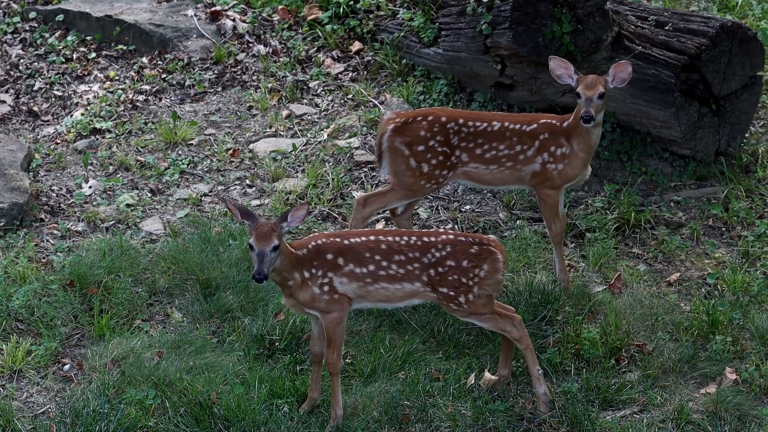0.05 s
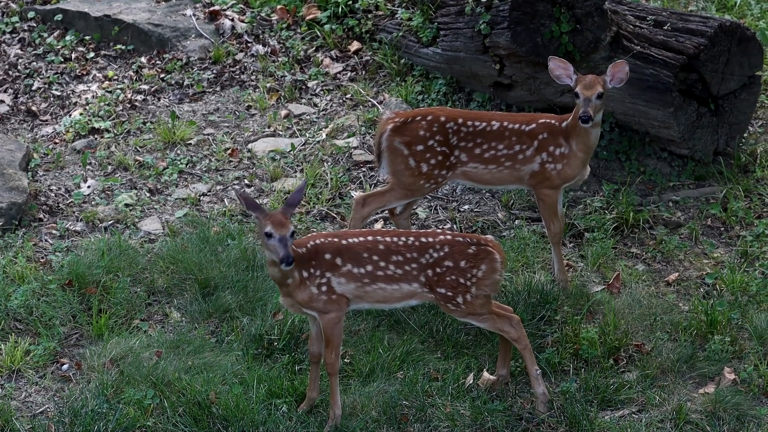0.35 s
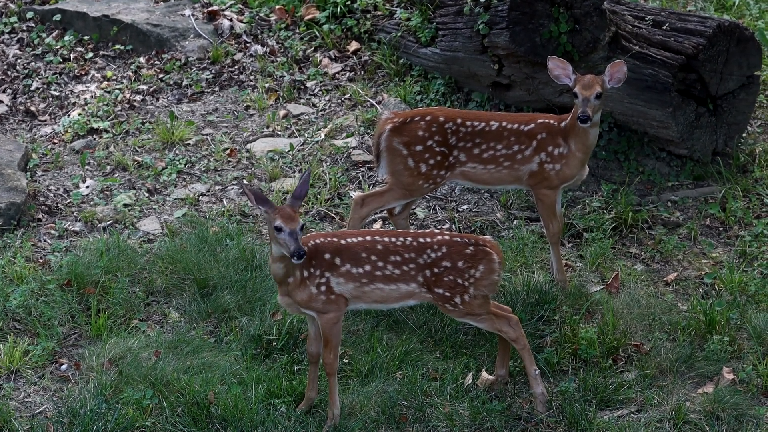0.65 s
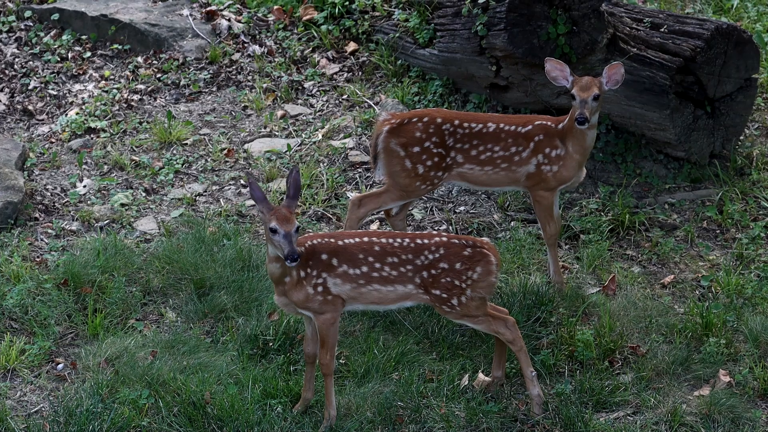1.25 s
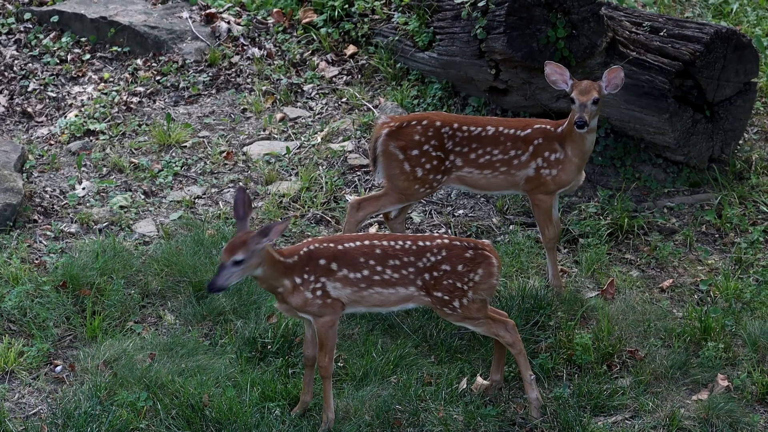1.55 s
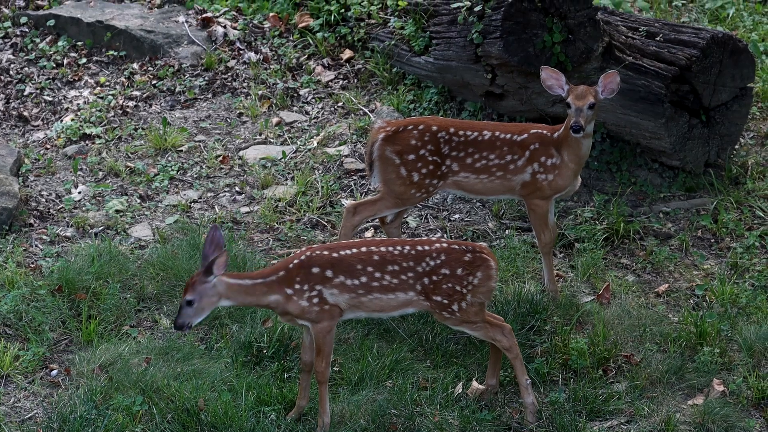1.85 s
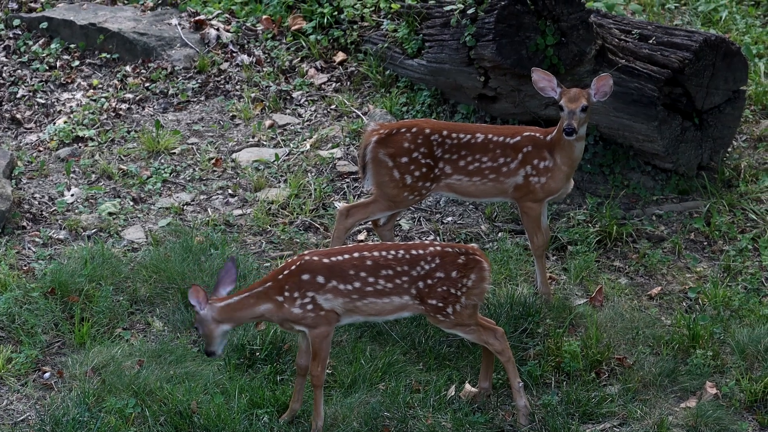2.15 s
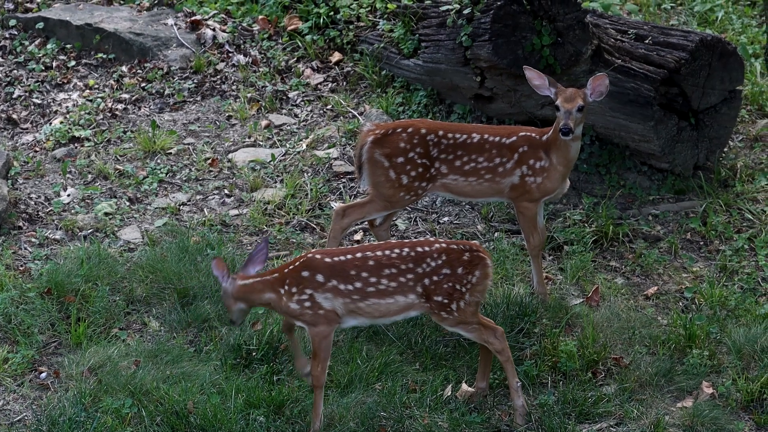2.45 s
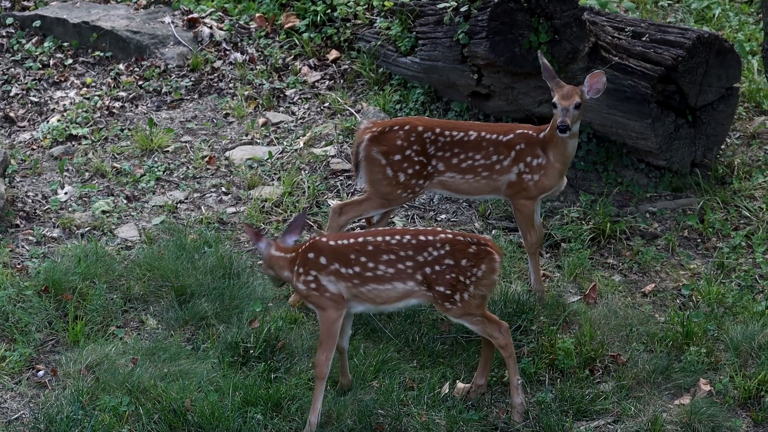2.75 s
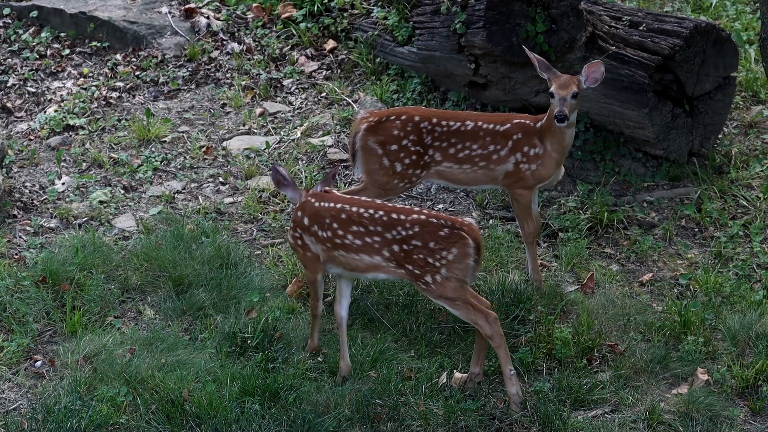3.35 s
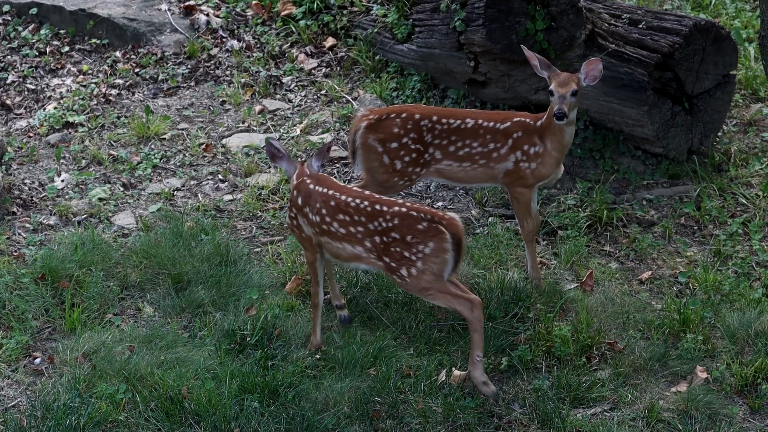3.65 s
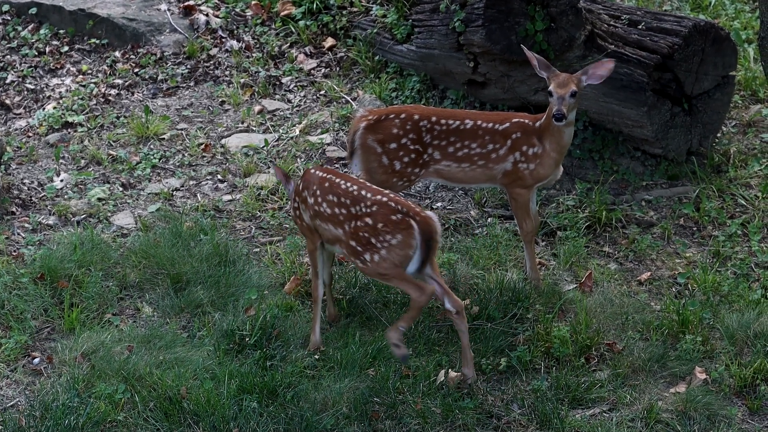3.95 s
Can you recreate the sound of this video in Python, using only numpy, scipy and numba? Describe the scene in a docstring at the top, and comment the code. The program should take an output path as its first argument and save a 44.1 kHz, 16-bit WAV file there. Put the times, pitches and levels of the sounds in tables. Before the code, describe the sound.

Cicadas buzz in a summer back yard, two nearer ones throbbing in turn over a steady, high chorus. Distant traffic murmurs underneath, and in the second half a few soft puffs of wind bump the microphone.

```python
"""Two cicadas throb out of step in the trees of a summer back yard, over a steady chorus of far ones.
Each buckles its ribs in a train of clicks that drives resonances: a thin whine builds and breaks
into a fuller, falling rasp, and leaves scatter the sound. Distant traffic murmurs below,
and a few soft, low buffets of air strike the microphone in a faint breeze."""
import sys
import numpy as np
from scipy import signal
from scipy.fft import rfft, irfft
from scipy.io import wavfile
from numba import njit

SR = 44100
rng = np.random.default_rng(int(sys.argv[2]) if len(sys.argv) > 2 else 0)


def transcribe(u):
    """Save the signal u as a 16-bit wav file named by the first command-line argument.

    u: samples, shape (n,) or (channels, n), limited to [-1, 1]; the rate is SR.
    q: integer samples, one column per channel.
    """
    v = np.clip(np.atleast_2d(u).T, -1, 1)
    q = np.round(v * 32767).astype(np.int16)
    wavfile.write(sys.argv[1], SR, q)


N = 176400
ROAD_PAN_DB = -1.5
# spectrum of air eddies on the microphone: f/Hz, relative level/dB
EDDY_SPECTRUM = [(20, -24), (50, -11.5), (100, 3), (150, -3), (250, -13), (400, -25.5), (900, -57),
                 (3000, -80)]


def cicada(throbs, level_db, click_hz, jitter, start_hz, width_hz,
           attack_s, build_s, whine_db, pan_db, wet_db):
    """Forced resonance: clicks ring a high whine that builds, then yields to the abdomen's falling rasp."""
    # narrow resonances in the buzz: f/Hz, bandwidth/Hz, relative level/dB
    modes = [(3030, 53, -4), (3356, 36, -11), (3620, 19, -7), (3760, 14, 7.5), (4080, 54, 0),
             (4300, 45, -2), (4645, 137, 1)]
    release_s, whine_cut_s = .04, .023
    t = np.arange(N) / SR
    rasp_hz, rasp_gain, whine_gain = np.full(N, float(start_hz)), 0, 0
    for start, length, rasp_db, lead_db, low_hz in [(a, b, c, e, d) for a, b, c, d, e in throbs]:
        age = t - start
        glide_hz = start_hz * (low_hz / start_hz) ** np.clip(age / length, 0, 1)
        rasp_hz = np.where(age < 0, rasp_hz, glide_hz)
        attack = np.clip(age / attack_s, 0, 1)
        release = np.exp(-np.maximum(age - length, 0) / release_s)
        rasp_gain += undb(rasp_db) * attack * release
        whine_gain += undb(lead_db) * np.exp(-(age / np.where(age < 0, build_s, whine_cut_s)) ** 2)
    clicks = tymbal(click_hz, jitter)
    rasp = rasp_gain * unit(resonate(clicks, rasp_hz, width_hz))
    whine = undb(whine_db) * whine_gain * unit(resonate(clicks, hz=5846, width_hz=1400))
    body_band = signal.butter(6, [3017, 7050], "band", fs=SR, output="sos")  # what the body radiates
    buzz = signal.sosfilt(body_band, rasp + whine)
    ringing = sum(undb(db + 6) * resonate(buzz, hz, width, stages=1) for hz, width, db in modes)
    return unit(leaves(buzz + ringing, wet_db)) * undb(level_db) * pan(pan_db)


def tymbal(click_hz, jitter, count=3000, scatter_db=2.5):
    """Elastic buckling: a cicada's ribs snap in a train of impulses, uneven in spacing and strength."""
    gap, size = rng.standard_normal((count, 2)).T
    at = (np.cumsum(np.exp(jitter * gap)) * SR / click_hz).astype(int)
    return np.bincount(at[at < N], undb(scatter_db * size)[at < N], N)


def leaves(x, wet_db, t60_s=.33):
    """Multiple scattering: foliage adds a decaying tail to the direct sound, different in each ear."""
    t = np.arange(SR // 2) / SR
    tail = rng.standard_normal((2, len(t))) * undb(-60 * t / t60_s)
    tail *= undb(wet_db) / np.sqrt(np.sum(tail ** 2, axis=1, keepdims=True))
    return x + irfft(rfft(tail, N) * rfft(x), N)


def chorus(count=10, click_hz=331.6, base_db=-33.5):
    """Incoherent summation: far cicadas, each with its own click rate and path, merge into a sizzle."""
    # spectrum of the chorus: f/Hz, relative level/dB
    spectrum = [(2000, -49), (2750, -54), (3150, -12), (3550, -1.5), (4000, -1.5), (4600, -2), (5250, 1),
                (5900, -1), (6400, -4.5), (6900, -10), (8100, -10.5), (8600, -18.5), (9300, -22.5),
                (10700, -20), (12200, -28), (14000, -39), (15500, -55)]
    # slow swell of the chorus: t/s, relative level/dB
    swell = [(0, 2), (.3, -1.5), (.55, 0.4), (.95, 1.3), (1.6, 0.1), (1.85, 0), (2.25, 0.1), (2.55, 0.8),
             (2.9, .5), (3.3, 0.6), (4, 0.4)]
    voices = 0
    for _ in range(count):
        clicks = tymbal(click_hz * np.exp(.15 * rng.standard_normal()), jitter=.25)
        clicks *= undb(2 * drift(3.8))
        path_blur = rng.standard_normal((2, SR // 8)) * np.linspace(1, 0, SR // 8)
        voices += rfft(clicks - clicks.mean()) * rfft(path_blur, N)
    return colour(irfft(voices, N), spectrum) * undb(base_db + over_time(swell)) * pan(-.5)


def traffic(level_db=-35, left_lag_s=4e-5):
    """Interaural delay and level set a far rumble slightly to the right; its bass is coherent."""
    # spectrum of distant engines and tyres: f/Hz, relative level/dB
    spectrum = [(20, -32), (40, -21), (65, -10), (120, 1.5), (210, -0.5), (300, -3), (420, -5), (650, -4.5),
                (900, -2), (1250, -7.5), (1700, -12), (2500, -21), (4000, -16), (9000, -59)]
    # likeness of the two ears' signals: f/Hz, correlation
    correlation = [(40, 1), (130, 1), (280, 0.84), (600, 0.6), (1100, 0.15), (3000, 0.017)]
    coherence = np.clip(over_hz(correlation), -.99, .99)
    mid, side = rfft(rng.standard_normal((2, N))) * np.sqrt([1 + coherence, 1 - coherence])
    delay = np.exp(-2j * np.pi * np.fft.rfftfreq(N, 1 / SR) * left_lag_s)
    ears = irfft(np.array([(mid + side) * delay, mid - side]), N)
    return colour(ears, spectrum) * undb(level_db) * pan(ROAD_PAN_DB)


def tyres():
    """Rolling noise: a soft band of far tyre roar, whose centre drifts as the cars change."""
    # tyre wash on the far road: t/s, centre f/Hz, level/dB
    wash = [(0, 870, -40.5), (.6, 840, -44), (1.4, 834, -46.5), (2, 910, -49), (3.2, 990, -45),
            (4, 905, -47)]
    centre_hz = over_time(wash)
    roar = np.array([resonate(ear, centre_hz, width_hz=430) for ear in rng.standard_normal((2, N))])
    return unit(roar) * undb(over_time(wash, column=2)) * pan(ROAD_PAN_DB)


def buffets():
    """Turbulent pressure: brief low puffs of air, uncorrelated at the two microphone ports."""
    # puffs: peak t/s, Gaussian width/s, level/dB, left minus right/dB, frequency ratio
    puffs = [(2.08, 0.021, -35, -24, 0.84), (2.322, 0.032, -30, 13, 1.13), (2.394, 0.01, -23, 19, 0.74),
             (2.426, 0.017, -22.5, -6, 0.82), (2.492, 0.015, -30.5, -24, 0.91),
             (2.614, 0.0068, -28, -13, 0.8), (2.852, 0.011, -23, -13, 0.93),
             (2.872, 0.0047, -18, -31, 1.14), (2.896, 0.012, -25.5, -9, 1.04), (2.972, 0.006, -26, 12, 0.8),
             (3.57, 0.0099, -35, 10, 0.77)]
    t, out = np.arange(N) / SR, 0
    eddies = rng.standard_normal((2, N))
    for at, width, db, pan_db, brightness in puffs:
        envelope = np.exp(-.5 * ((t - at) / width) ** 2)
        puff = colour(eddies * envelope, EDDY_SPECTRUM, brightness)
        puff *= np.sqrt(np.sum(envelope ** 2) / np.sum(puff ** 2, axis=1, keepdims=True))
        out += puff * undb(db) * unit(pan(pan_db))
    return out


def breeze():
    """Weak turbulence: moving air flutters faintly on the microphone around the buffets."""
    # strength of the breeze: t/s, level/dB
    strength = [(0, -59), (1.5, -58), (2.101, -43.5), (2.6, -48), (3.1, -49), (4, -56)]
    flutter = colour(rng.standard_normal((2, N)), EDDY_SPECTRUM, brightness=.64)
    return flutter * undb(over_time(strength) + 2 * drift(6.3))


def resonate(x, hz, width_hz, stages=2):
    """Resonators in cascade: each stage steepens the skirts of the band."""
    for _ in range(stages):
        x = bandpass(x, hz * np.ones(N), float(width_hz))
    return x


@njit
def bandpass(x, hz, width_hz):
    """Second-order resonance with unit gain at its moving centre."""
    y, band_state, low_state = np.empty(len(x)), 0., 0.
    for i in range(len(x)):
        tuning, damping = np.tan(np.pi * hz[i] / SR), width_hz / hz[i]
        band = (band_state + tuning * (x[i] - low_state)) / (1 + tuning * (tuning + damping))
        band_state = 2 * band - band_state
        low_state += 2 * tuning * band
        y[i] = damping * band
    return y


def colour(x, spectrum, brightness=1):
    """Linear filtering by (f/Hz, level/dB) points, their frequencies times brightness; rms 1."""
    gain = undb(over_hz([(hz * brightness, db) for hz, db in spectrum]))
    return unit(irfft(rfft(x) * gain, N))


def drift(rate_hz):
    """Low-passed noise: a smooth random drift of spread about 1."""
    f = np.fft.rfftfreq(2 * N, 1 / SR)
    return unit(irfft(rfft(rng.standard_normal(2 * N)) * np.exp(-(f / rate_hz) ** 2)))[:N]


def over_hz(points):
    """Interpolation of (f/Hz, value) points in log frequency."""
    hz, value = np.array(points, float).T
    return np.interp(np.log(np.fft.rfftfreq(N, 1 / SR) + 1), np.log(hz), value)


def over_time(points, column=1):
    """Linear interpolation of (t/s, values) rows at every sample."""
    columns = np.array(points, float).T
    return np.interp(np.arange(N) / SR, columns[0], columns[column])


def pan(db):
    """Interaural level difference, left minus right, as two gains."""
    return undb(np.array([[db], [-db]]) / 2)


def undb(db):
    """Decibels to amplitude ratio."""
    return 10 ** (np.asarray(db) / 20)


def unit(x):
    """Normalisation to rms 1."""
    return x / np.sqrt(np.mean(x ** 2))


def scene():
    """Superposition of two near cicadas, the far chorus, traffic and moving air."""
    # each cicada's throbs: t/s, length/s, relative rasp level/dB, lowest f/Hz, relative whine level/dB
    first_throbs = [(.41, 0.18, -4, 3400, 1), (1.145, 0.11, -1, 3450, 1), (1.775, 0.11, -1.5, 3400, 2.5),
                    (2.39, 0.107, 1, 3380, 1), (3.028, .1, 2, 3200, -0.5), (3.672, 0.076, 5.5, 3470, 0)]
    second_throbs = [(-.13, 0.2, 0.5, 3700, -1), (.59, 0.13, .5, 4000, -0.5), (1.265, 0.099, 3, 3950, -2),
                     (1.905, 0.095, 4.5, 3740, 1), (2.555, 0.15, 2.5, 3670, -.5),
                     (3.27, 0.13, 0, 3830, 0.5), (3.93, .15, -6, 4000, -2)]
    first = cicada(first_throbs, level_db=-39.5, click_hz=339.5, jitter=.12, start_hz=4900,
                   width_hz=1250, attack_s=.013, build_s=.29, whine_db=-2.5, pan_db=-2, wet_db=5)
    second = cicada(second_throbs, level_db=-39.5, click_hz=188.3, jitter=.08, start_hz=5120,
                    width_hz=1500, attack_s=.027, build_s=.77, whine_db=-1, pan_db=-3, wet_db=7)
    return first + second + chorus() + traffic() + tyres() + breeze() + buffets()


def record(dry, top_hz=15000):
    """Band limiting: a steep low-pass cuts the highest treble."""
    return signal.sosfilt(signal.ellip(8, .2, 70, top_hz, fs=SR, output="sos"), dry)


dry = scene()
out = record(dry)
transcribe(out)
```